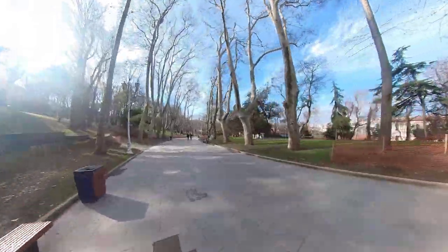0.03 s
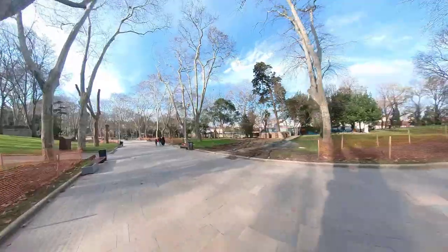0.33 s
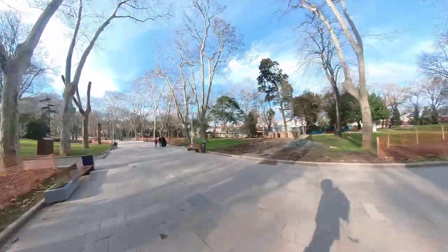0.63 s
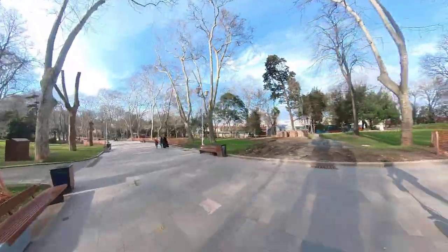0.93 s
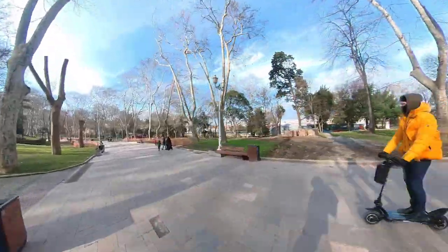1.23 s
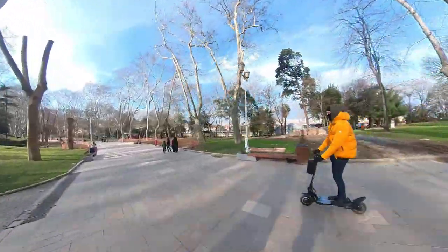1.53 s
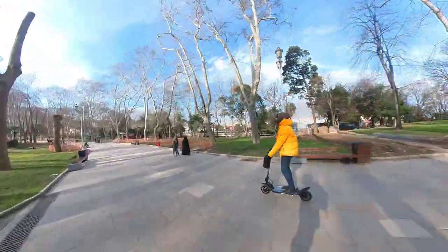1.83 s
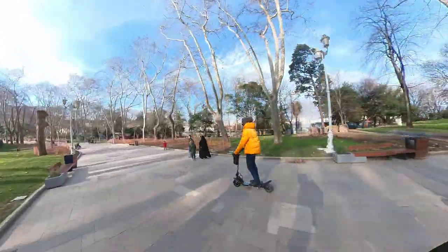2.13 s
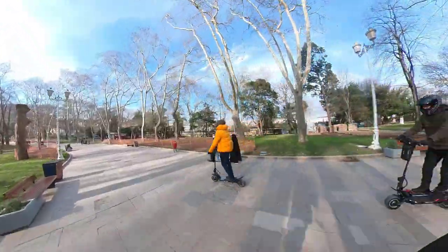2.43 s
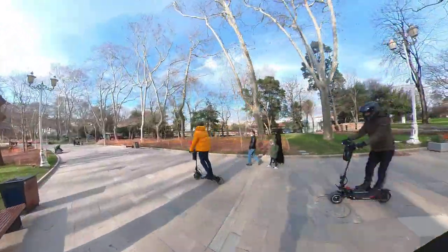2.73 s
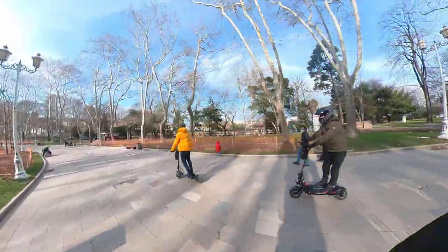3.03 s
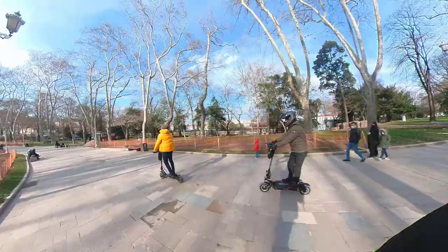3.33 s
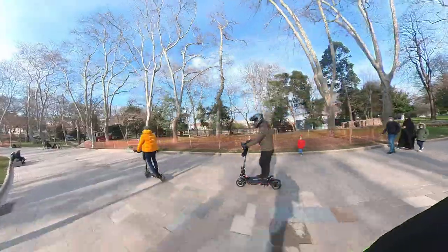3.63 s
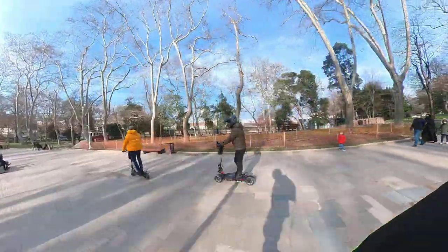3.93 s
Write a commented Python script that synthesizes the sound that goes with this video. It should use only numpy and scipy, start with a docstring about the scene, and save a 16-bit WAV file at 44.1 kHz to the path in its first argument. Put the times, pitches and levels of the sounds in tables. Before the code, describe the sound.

Electric scooters ride over gritty paving outdoors, heard from one of them through low wind rumble. Tyre noise swells as two others pass, the first with a falling hum, while a wheel thumps quickly and loose parts rattle.

```python
"""An electric scooter rides along a paved park path while two others overtake it.
Wind and the booming frame rumble at the microphone, which rides along, and a wheel thumps once a turn.
Tyres roar and hiss on the gritty slabs. The first passing scooter rushes and drones with a sinking
pitch, and loose parts rattle at the joints in the paving."""
import sys
import numpy as np
from scipy import signal
from scipy.io import wavfile
from scipy.ndimage import uniform_filter1d

SR = 44100
rng = np.random.default_rng(int(sys.argv[2]) if len(sys.argv) > 2 else 0)


def output_pcm(signal):
    """Save a mono or channel-first signal as 16-bit PCM at the path in sys.argv[1].

    Samples are clipped to [-1, 1] before scaling.
    """
    pcm = np.clip(np.atleast_2d(signal).T, -1, 1) * 32767
    wavfile.write(sys.argv[1], SR, np.round(pcm).astype(np.int16))


N = 176400
TIME = np.arange(N) / SR

# strength of the head wind: t/s, level/dB
WIND_LEVEL = [(0, -27), (0.3, -18), (0.5, -25), (1.5, -22), (2.1, -25.5), (2.6, -25.5), (3.1, -21.5),
              (3.6, -22.5), (4, -21.5)]
# the wind's mix of low and high tones: f/Hz, level/dB
WIND_COLOUR = [(22, -21.5), (32, -10.5), (45, -2), (68, 0), (100, -11.5), (140, -11.5), (200, -15),
               (260, -26.5)]
# gusts that hit the microphone: t/s, level/dB, half length/s
GUSTS = [(0.182, -24.5, 0.011), (0.304, -26.5, 0.017), (0.634, -22.5, 0.013), (1.274, -24.5, 0.027),
         (3.695, -20.5, 0.02), (3.773, -22.5, 0.019), (3.865, -20.5, 0.021), (3.942, -23, .02)]
# boom of the frame: t/s, level/dB
BOOM_LEVEL = [(0, -16.5), (0.15, -27.5), (0.37, -32.5), (0.41, -18.5), (1.2, -22.5), (2.4, -19), (2.9, -22),
              (3.35, -19.5), (4, -25.5)]
# steady rolling of the ridden scooter: f/Hz, level/dB
ROLLING_COLOUR = [(220, -0.5), (330, 0), (450, 0), (560, -9), (720, -9.5), (1100, -16.5), (1600, -25.5),
                  (2500, -34)]
# hollow rumble of the passing tyres: t/s, level/dB
HOLLOW_LEVEL = [(0, -50.5), (0.8, -50), (1.05, -37), (1.4, -32), (1.75, -31), (2.2, -37.5), (2.7, -29.5),
                (3.0, -32.5), (3.5, -34.5), (4, -40)]
# its mix of tones: f/Hz, level/dB
HOLLOW_COLOUR = [(150, -9.5), (230, -0.5), (300, 0.5), (370, 2), (450, -4.5), (550, -13), (800, -38.5)]
# roar of the passing tyres: t/s, relative level/dB
ROAR_LEVEL = [(0, -58.5), (0.75, -60), (1.0, -46), (1.25, -43), (1.5, -40.5), (1.9, -41.5), (2.25, -42.5),
              (2.65, -43), (2.9, -41.5), (3.05, -41.5), (3.15, -42.5), (3.4, -41), (3.7, -45), (4, -43)]
# its mix of tones: f/Hz, level/dB
ROAR_COLOUR = [(560, 1.5), (720, 2.5), (930, 1), (1100, -3), (1400, -3), (2150, -8), (2800, -14),
               (3600, -20.5), (4400, -36.5)]
# fine hiss of the passing tyres: t/s, relative level/dB
HISS_LEVEL = [(0.03, -79), (0.48, -79.5), (0.64, -74), (0.72, -77), (1.18, -68), (1.235, -58),
              (1.73, -60.5), (1.78, -57.5), (2.3, -63.5), (2.85, -57.5), (3.33, -57.5), (3.51, -64.5),
              (3.54, -62.5), (3.98, -63.5)]
# low bumps at the microphone: t/s, level/dB
BUMPS = [(0.632, -11.5), (3.475, -18), (3.54, -12)]
# tread rush of the first passing scooter: t/s, centre f/Hz, level/dB
RUSH = [(0.7, 2300, -71.5), (1.0, 2250, -53), (1.3, 2150, -45.5), (1.52, 1953, -45), (1.8, 1496, -45.5),
        (2.3, 1397, -52.5)]
# drone of that scooter: t/s, f/Hz, level/dB
DRONE = [(0.75, 663, -52.5), (0.95, 655, -37.5), (1.15, 663.7, -38.5), (1.45, 646.3, -39),
         (1.9, 604, -41.5), (2.3, 587.6, -45.5), (2.6, 597, -50)]
# the drone's two tones: multiple of its pitch, relative level/dB, width/Hz
DRONE_TONES = [(.695, 3.5, 42), (1, 0, 30.1)]
# one thump per wheel turn: t/s of its top, level/dB, swell time/s
THUMPS = [(1.421, -18, 0.014), (1.522, -19.5, 0.025), (1.619, -16.5, 0.018), (1.715, -20.5, 0.011),
          (1.82, -19.5, 0.014), (1.913, -14, 0.015), (2.003, -15, 0.0053), (2.116, -15, 0.017),
          (2.211, -13.5, 0.017), (2.296, -16, 0.0051), (2.394, -15.5, 0.009), (2.509, -17.5, 0.028),
          (2.592, -13, 0.0027), (2.68, -16, 0.015), (2.784, -16.5, 0.013), (2.885, -14.5, 0.0051),
          (2.983, -12.5, 0.0082), (3.078, -15, 0.0061), (3.178, -16.5, .007), (3.279, -17.5, .008),
          (3.374, -14.5, 0.003), (3.47, -13.5, 0.0029), (3.573, -15.5, 0.0056)]
# tones the wheel rings with: multiple of its pitch, relative level/dB
WHEEL_TONES = [(.85, -13), (1.001, -4), (1.37, -25)]
# scuffs of the tyres: t/s, level/dB, half length/s, centre f/Hz, width/Hz
SCUFFS = [(1.49, -45, 0.014, 2400, 1200), (1.85, -54.5, 0.044, 3530, 905), (2.989, -39, 0.013, 1400, 1700),
          (3.02, -41, 0.02, 1000, 1100), (3.258, -59, 0.12, 6480, 400), (3.85, -54.5, 0.66, 2770, 1500)]
# knocks at the paving joints: t/s, relative level/dB, treble cutoff f/Hz
KNOCKS = [(1.476, -27, 3400), (1.574, -23, 2500), (1.659, -21.5, 2600), (1.792, -24, 3070),
          (1.873, -17.5, 2200), (2.434, -27, 1800), (2.583, -20.5, 2200), (2.638, -20, 2800),
          (2.872, -20, 2100), (2.9957, -12, 1920), (3.013, -18, 1600), (3.035, -18.5, 1900),
          (3.0844, -18, 3000), (3.241, -17, 1770), (3.31, -20, 2200), (3.83, -20, 2200)]
# tones the loose parts ring with: f/Hz, time to fade by 60 dB/s, relative level/dB
RATTLE_TONES = [(600, 0.044, -5), (775, 0.023, -1), (1087, 0.038, -9.5), (1323, 0.0097, 2),
                (1500, 0.007, -0.5), (2040, 0.034, -10), (2200, 0.0045, -6.5), (3220, 0.028, -16.5)]


def from_db(db):
    """Turn decibels into a factor to multiply a sound by."""
    return 10 ** (np.asarray(db) / 20)


def rms_one(x):
    """Scale a signal so that its average strength (rms) is 1."""
    return x / np.sqrt(np.mean(x ** 2) + 1e-20)


def in_time(rows):
    """Join a table's points with straight lines: one curve for each column after the time."""
    times, *columns = np.transpose(rows)
    return [np.interp(TIME, times, column) for column in columns]


def drift(rate_hz):
    """A smooth random wobble of typical size 1; a higher rate wobbles faster."""
    step, run_in = 40, 2000
    memory = np.exp(-2 * np.pi * rate_hz * step / SR)
    noise = rng.standard_normal(N // step + run_in + 2)
    slow = signal.lfilter([1], [1, -2 * memory, memory ** 2], noise)[run_in:]
    return np.interp(np.arange(N) / step, np.arange(len(slow)), rms_one(slow))


def band(x, hz, width_hz):
    """Keep only the frequencies around hz; a short run-in lets the filter settle."""
    low, run_in = np.hypot(hz, width_hz / 2) - width_hz / 2, SR // 10
    sos = signal.butter(2, [low, min(low + width_hz, SR / 2 - 1)], "band", fs=SR, output="sos")
    return signal.sosfilt(sos, np.concatenate([x[-run_in:], x]) + 1e-18)[run_in:]


def low_pass(x, hz):
    """Dull a sound by turning down what lies above hz."""
    return signal.sosfilt(signal.butter(3, hz, fs=SR, output="sos"), x + 1e-18)


def band_noise(hz, width_hz):
    """Noise around one frequency, at strength 1."""
    return rms_one(band(rng.standard_normal(N), hz, width_hz))


def swell(t, half_s):
    """A bell-shaped rise and fall with its top at time t."""
    return np.exp(-.5 * ((TIME - t) / half_s) ** 2)


def coloured(two_noises, colour, flutter_db):
    """Shape noise into a mix of narrow bands that flutter partly together, partly alone."""
    hz, db = np.transpose(colour)
    out, together = 0, drift(40)
    for k, centre in enumerate(20 * 2 ** (np.arange(37) / 4)):  # four bands to an octave
        alone = drift(32)
        if hz[0] / 1.15 < centre < hz[-1] * 1.15:
            band_db = np.interp(np.log(centre), np.log(hz), db) + flutter_db * (together + 0.98 * alone)
            out += from_db(band_db) * band(two_noises[k % 2], centre, centre / 5.5)
    return rms_one(out)


def evened(x, share):
    """Smooth away a share (0 to 1) of the slow swings in loudness."""
    power = uniform_filter1d(uniform_filter1d(x ** 2, SR // 25), SR // 70) + 1e-9
    return rms_one(x / power ** (share / 2))


def gritty(hits_per_s=900, spread_db=4, share=0.45):
    """Two streams of tiny grit hits over smooth rolling noise."""
    sizes = from_db(spread_db * np.minimum(rng.exponential(1, (2, N)), 4))
    signs = rng.choice([-1, 1], (2, N))
    grit = rms_one(sizes * signs * (rng.random((2, N)) < hits_per_s / SR))
    return np.sqrt(share) * grit + np.sqrt(1 - share) * rng.standard_normal((2, N))


def wind():
    """The head wind rumbles on the microphone, with a few short gusts."""
    rumble = evened(coloured(rng.standard_normal((2, N)), WIND_COLOUR, flutter_db=1.5), share=0.27)
    gust_noise = evened(band_noise(hz=110, width_hz=88), share=0.84)
    gusts = sum(from_db(db) * swell(t, half_s) for t, db, half_s in GUSTS)
    return from_db(in_time(WIND_LEVEL)[0]) * rumble + gusts * gust_noise


def frame_boom():
    """The paving keeps shaking the frame, which booms at one low pitch."""
    return from_db(in_time(BOOM_LEVEL)[0]) * evened(band_noise(hz=91.46, width_hz=22.3), share=0.51)


def own_tyres():
    """The ridden scooter's tyres roll steadily over the grit."""
    return from_db(-36.5) * coloured(gritty(), ROLLING_COLOUR, flutter_db=1.0)


def passing_tyres(roar_boost_db=1.5, hiss_boost_db=2, hiss_flutter_db=1.54):
    """The other scooters' tyres make a hollow rumble, a gritty roar and a fine hiss on the slabs."""
    hollow = evened(coloured(rng.standard_normal((2, N)), HOLLOW_COLOUR, flutter_db=2.5), share=0.24)
    hollow *= from_db(in_time(HOLLOW_LEVEL)[0])
    roar = coloured(gritty(), ROAR_COLOUR, flutter_db=1.5)
    roar *= from_db(in_time(ROAR_LEVEL)[0] + roar_boost_db)
    hiss_db = in_time(HISS_LEVEL)[0] + hiss_boost_db + hiss_flutter_db * drift(25)
    hiss = from_db(hiss_db) * rms_one(band(gritty()[0], hz=6750, width_hz=1490))
    return hollow + roar + hiss


def bumps(half_s=0.0021):
    """Each bump pushes one short, rounded pulse of pressure into the microphone."""
    return sum(from_db(db) * swell(t, half_s) * (1 - ((TIME - t) / half_s) ** 2) for t, db in BUMPS)


def passing_rush(width_hz=1000):
    """The tread of the first passing scooter makes a broad rush that sinks as it goes by."""
    hz, db = in_time(RUSH)
    angle = 2 * np.pi * np.cumsum(hz) / SR
    noise_a, noise_b = low_pass(gritty(), width_hz / 2)
    rush = noise_a * np.sin(angle) + noise_b * np.cos(angle)  # moves the noise up to centre on hz
    return from_db(db) * rms_one(rush)


def passing_drone():
    """The first passing scooter drones with two rough tones that sink as it goes by."""
    hz, db = in_time(DRONE)
    angle = 2 * np.pi * np.cumsum(hz) / SR
    out = 0
    for multiple, tone_db, width_hz in DRONE_TONES:
        tone = drift(width_hz) * np.sin(multiple * angle) + drift(width_hz) * np.cos(multiple * angle)
        out += from_db(db + tone_db) * tone
    return out


def wheel_thumps(pitch_hz=292.8, scatter_hz=7.2, decay_s=0.019, roughness=0.2):
    """With each turn, the wheel's ring and a rough thud swell up and die away."""
    out, thud = 0, from_db(-16) * evened(band_noise(hz=278, width_hz=140), share=1)
    for t, db, swell_s in THUMPS:
        detune, *phases = rng.standard_normal(len(WHEEL_TONES) + 1)
        age = TIME - t
        shape = np.where(age < 0, swell(t, swell_s), np.exp(-(np.abs(age) / decay_s) ** 1.6))
        cycles = (pitch_hz + scatter_hz * detune) * age
        ring = sum(from_db(tone_db) * np.sin(2 * np.pi * (multiple * cycles + phase))
                   for (multiple, tone_db), phase in zip(WHEEL_TONES, phases))
        out += from_db(db) * shape * (ring + thud)
    return out * (1 + roughness * drift(81))


def tyre_scuffs():
    """The tyres scuff the paving, each time with a swell of noise."""
    return sum(from_db(db) * swell(t, half_s) * rms_one(band(band_noise(hz, width), hz, width))
               for t, db, half_s, hz, width in SCUFFS)


def rattles(attack_s=0.0011, clack_db=-6, clack_s=0.002, ring_db=-4.5, spread_db=2, pitch_spread=0.09):
    """Loose parts hit with a hard clack and then ring, a little differently at every knock."""
    out = 0
    for t, db, cutoff_hz in KNOCKS:
        age = np.maximum(TIME - t, 0)
        attack = 1 - np.exp(-age / attack_s)
        clack_fade = np.exp(-np.minimum(age / clack_s, 30))
        knock = from_db(clack_db) * clack_fade * band_noise(hz=1387, width_hz=2580)
        for hz, fade_s, tone_db in RATTLE_TONES:
            detune, strength = rng.standard_normal(2)
            gain = from_db(ring_db + tone_db + spread_db * strength - 60 * np.minimum(age / fade_s, 4))
            knock += gain * np.sin(2 * np.pi * hz * (1 + pitch_spread * detune) * age)
        out += from_db(db) * low_pass(attack * knock, cutoff_hz)
    return out


def scene(dip_db=-13.5):
    """All the sounds add up at one microphone; the level dips briefly near the start."""
    heard = wind() + bumps() + frame_boom() + wheel_thumps() + own_tyres()
    heard += passing_tyres() + tyre_scuffs() + passing_rush() + passing_drone() + rattles()
    dip = from_db(dip_db * swell(t=0.264, half_s=0.0033))
    return (heard * dip)[None]


def record(dry, dip_hz=4680, dip_width_hz=1300, leak=0.52, ceiling=0.9, cutoff_hz=8700):
    """The microphone has a dip in the treble; peaks are rounded and the highest tones are cut."""
    notched = signal.lfilter(*signal.iirnotch(dip_hz, dip_hz / dip_width_hz, fs=SR), dry)
    heard = notched + leak * (dry - notched)
    rounded = ceiling * np.tanh(heard / ceiling)
    return signal.sosfilt(signal.ellip(10, .1, 90, cutoff_hz, fs=SR, output="sos"), rounded)


dry = scene()
out = record(dry)
output_pcm(out)
```